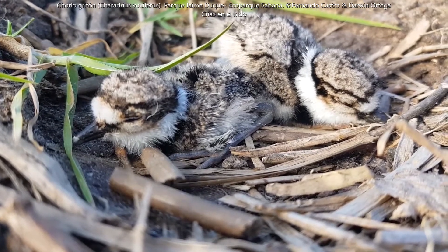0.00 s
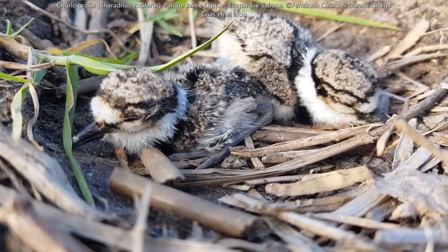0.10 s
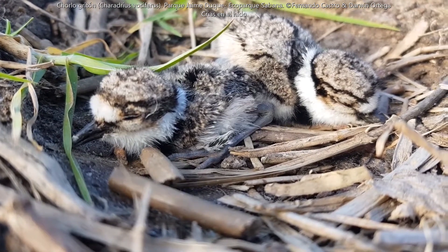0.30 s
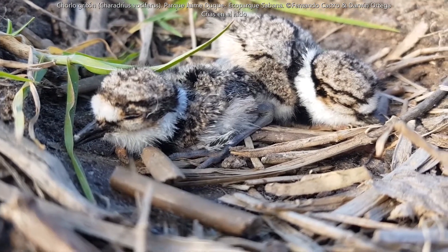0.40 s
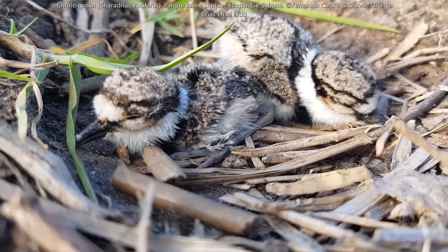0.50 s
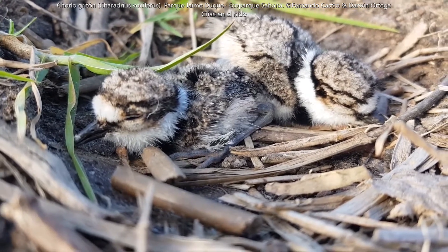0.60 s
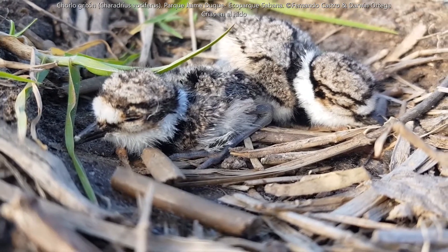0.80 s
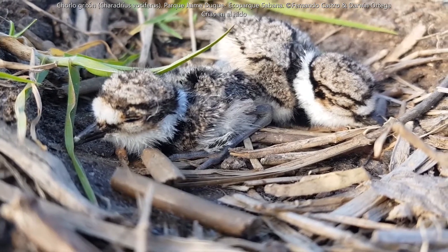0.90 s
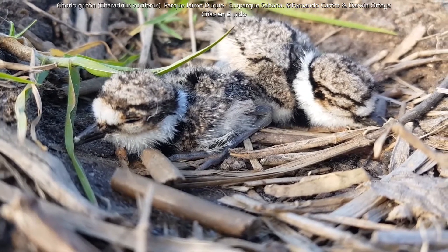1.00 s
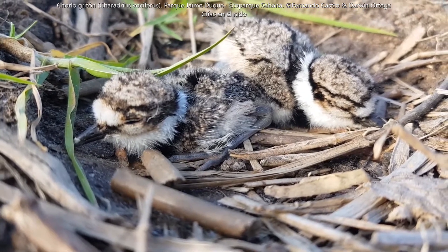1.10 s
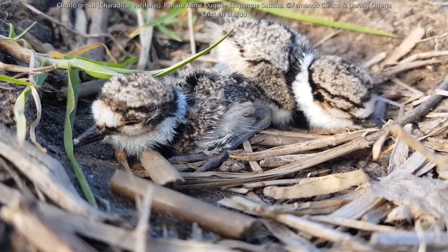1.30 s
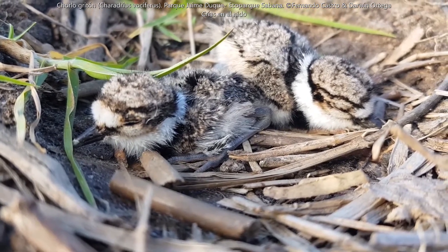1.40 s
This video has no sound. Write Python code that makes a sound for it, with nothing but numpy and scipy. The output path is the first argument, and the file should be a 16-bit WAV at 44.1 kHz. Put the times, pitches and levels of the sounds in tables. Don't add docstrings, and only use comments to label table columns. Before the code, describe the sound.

A small plover close by gives one sharp, clear rising whistle with a brief rough break, then two faint nasal squawks and a thin distant whistle, over low wind rumble on an outdoor stereo microphone.

```python
import sys
import numpy as np
from scipy import signal
from scipy.io import wavfile
from scipy.ndimage import uniform_filter1d

SR = 44100
rng = np.random.default_rng(int(sys.argv[2]) if len(sys.argv) > 2 else 0)


def unload_audio(sound):
    columns = np.transpose(np.atleast_2d(sound))
    steps = np.round(np.clip(columns, -1, 1) * 32767)
    wavfile.write(sys.argv[1], SR, steps.astype(np.int16))


def volts_from_decibels(level):
    exponent = np.asarray(level, float) / 20
    return 10 ** exponent


N = 63945

# time in s, pitch in Hz, level in dB, octave level in dB, left-right in dB.
NEAR_PARTS = [
    [(.2055, 3150, -50, -72, 2.5), (.208, 3290, -36, -63, 4), (.212, 3610, -35, -58, 8),
     (.218, 3865, -27.5, -57, 7), (.222, 4050, -31, -54, 5), (.2243, 4280, -42, -51, .5),
     (.226, 4390, -36.5, -50, .5), (.228, 4210, -38, -53, -5), (.230, 4250, -43, -57, -10)],
    [(.234, 4330, -34, -58, -5), (.242, 4500, -27, -53, 5), (.252, 4610, -22, -50, 7.5),
     (.262, 4682, -22, -50, 8), (.274, 4725, -22, -49.5, 8.5), (.282, 4720, -23, -49, 8),
     (.286, 4665, -20, -47, 7.5), (.298, 4678, -20.5, -46, 7), (.306, 4575, -19, -46, 6.5)],
    [(.312, 4535, -22, -48, 5.5), (.324, 4508, -23.5, -49, 4.5), (.334, 4520, -23.5, -50, 4),
     (.378, 4606, -22, -50.5, 6), (.392, 4615, -22, -50.5, 7), (.404, 4652, -22, -51, 8),
     (.42, 4670, -23, -51, 8.5), (.44, 4645, -26, -55, 8.5), (.452, 4688, -29, -57, 8.5)],
    [(.476, 4776, -29, -61, 8), (.504, 4892, -31, -65, 7.5), (.528, 4900, -36.5, -74, 7),
     (.541, 4890, -60, -96, -6)],
]
# time in s, pitch in Hz, level in dB,
# octave level in dB, left-right in dB.
REGISTER_JUMP = [(.339, 4480, -26.5, -53, 4.5), (.342, 4610, -25, -56, 5.5), (.35, 4650, -23, -54, 6.5),
                 (.354, 4600, -23.5, -54, 7), (.357, 4690, -24, -54, 7.5), (.362, 4710, -26.5, -56, 8),
                 (.368, 4712, -24.5, -55, 8), (.3705, 4600, -23, -55, 7.5)]
# centre in s, length in s, flutter in dB, flutter in Hz, width in Hz.
ROUGH_SPELLS = [(.2755, .004, -18, 1200, 1200), (.279, .003, -14, 1300, 1200),
                (.2825, .004, -11, 1100, 1400), (.2885, .004, -17, 1000, 400),
                (.285, .055, -26, 1500, 3200), (.342, .003, -22, 900, 900), (.357, .03, -23, 700, 1600),
                (.31, .17, -31, 900, 3000), (.398, .012, -26, 700, 500), (.385, .03, -38, 1800, 500),
                (.226, .008, -16, 700, 1000), (.212, .014, -21, 2000, 5000), (.528, .01, -23, 1000, 1600)]
# centre in s, length in s, level below pitch in dB, level above pitch in dB.
TRIPLING = (.297, .013, -19, -30)
# time in s, pitch in Hz, level in dB, half-pitch line in dB,
# left-right in dB.
FAR_PARTS = [
    [(0.978, 3966, -86, -6, 4), (0.984, 3938, -56.5, -7, 1), (1.004, 4015, -53, -5, -9),
     (1.012, 3904, -47, -19, 1)],
    [(1.03, 3554, -57.5, -16, -12), (1.056, 3494, -59.5, -21, -13), (1.08, 3530, -53, -26, -7),
     (1.1, 3614, -54, -14, -7)],
    [(1.14, 3697, -57, -8, 19), (1.196, 3755, -56.5, -2, 10), (1.234, 3817, -60.5, -9, -23),
     (1.266, 3853, -49.5, -11.5, -8), (1.336, 3860, -56.5, -7, 3), (1.382, 3908, -53, -11.5, -2),
     (1.416, 3920, -47.5, -28, -2), (1.45, 3912, -47, -20, -2)],
]
# time in s, pitch in Hz, level in dB, half-pitch line in dB,
# left-right in dB.
FAR_DROP = [
    (1.017, 3850, -68, -12, -3.5),
    (1.024, 3640, -62, -16, -5),
]
# multiple of the pitch, level in dB.
FAR_PARTIALS = [(1, 0), (1.5, -30), (2, -32), (2.5, -38)]
# start in s, length in s, level in dB, top pitch in Hz, end pitch as a share of the top.
SQUAWKS = [
    (.628, .085, -43, 835, .75),
    (1.108, .08, -40, 845, .76),
]
# centre in Hz, width in Hz, level in dB.
BEAK_RESONANCES = [(2380, 560, 1), (3150, 800, -5), (3650, 450, -9), (5800, 400, -16), (7700, 500, -26),
                   (10400, 1200, -28)]
# share of its length, level in dB.
SQUAWK_EFFORT = [(0, -8), (.09, -5), (.19, 2), (.29, -2), (.37, -8), (.48, -2), (.62, -5), (.75, -9),
                 (1, -12)]
# start in s, length in s, level in dB,
# pitch in Hz.
PEEPS = [
    (.079, .013, -62, 3150),
    (.173, .011, -65, 3130),
    (.156, .006, -70, 5200),
    (.198, .004, -60, 3900),
    (.201, .002, -58, 3600),
    (1.109, .014, -50, 2310),
    (1.112, .012, -57, 3110),
]
# centre in s, length in s, level in dB, centre in Hz, width in octaves.
RASPS = [
    (.67, .1, -63, 2800, 1.0),
    (1.155, .1, -62, 3000, .8),
    (.279, .012, -41, 3300, .2),
    (.428, .02, -66, 5950, .04),
    (.48, .06, -72, 8500, .06),
]
# centre in s, length in s, level in dB, centre in Hz, width in octaves.
RUSTLES = [
    (0.466, 0.056, -52.5, 1700, 1),
    (0.58, 0.33, -52, 1230, 1),
    (0.67, 0.085, -65, 10000, 0.23),
    (0.24, .08, -72, 2100, 0.26),
    (0.442, 0.13, -42.5, 117, 0.38),
    (.572, 0.035, -33, 65, 0.65),
    (0.896, 0.061, -42, 68, 0.46),
    (1.424, 0.13, -55, 170, 0.34),
    (1.29, 0.28, -77, 11000, 0.51),
]
# frequency in Hz, density in dB per Hz.
WIND_SPECTRUM = [(12, -45), (20, -34.5), (64, -0.5), (182, -12.5), (248, -15), (285, -10), (468, -16.5),
                 (518, -17.5), (1200, -27.5), (1560, -83), (2640, -120)]
# frequency in Hz, density in dB per Hz.
AIR_SPECTRUM = [(1200, 1), (2000, -11.5), (3300, -18), (6200, -23), (6800, -51), (8200, -34), (10000, -34),
                (11600, -36.5)]
# frequency in Hz, left-right likeness from 0 to 1.
PORT_LIKENESS = [(30, .3), (55, .6), (140, .94), (300, .91), (600, .68), (1400, .4), (3000, .15),
                 (5000, .1)]
# frequency in Hz, left-right in dB.
PORT_BALANCE = [(60, -0.5), (200, 0), (700, 3.5), (1300, 1), (3000, -4), (8000, -2.5)]
# centre in s, length in s, low edge in Hz, high edge in Hz.
HISS_GATE = (.455, .11, 5600, 8200)


def evened(x):
    return x / np.sqrt(np.mean(abs(x) ** 2) + 1e-20)


def read(points, hz):
    f, value = np.transpose(points)
    return np.interp(np.log(hz + 1), np.log(f + 1), value)


def bump(centre, length):
    return np.exp(-abs((np.arange(N) / SR - centre) / (length / 1.8)) ** 3)


def curve(parts):
    t = np.arange(N) / SR
    rows = np.array(sorted(tuple(row) for part in parts for row in part))
    inside = 1. * (t >= rows[0, 0]) * (t <= rows[-1, 0])
    columns = [uniform_filter1d(np.interp(t, rows[:, 0], c), size=60) for c in rows.T[1:]]
    return columns, uniform_filter1d(inside, size=90)


def placed(z, pan_db, lag_rad):
    left = volts_from_decibels(pan_db / 2) * np.exp(1j * lag_rad)
    right = volts_from_decibels(-pan_db / 2)
    return np.sqrt(2) * np.real([z * left, z * right]) * 2 / abs(left + right)


def flutter(hz, width):
    f = np.fft.fftfreq(N, 1 / SR)
    z = rng.standard_normal(N) + 1j * rng.standard_normal(N)
    return evened(np.fft.ifft(z * np.exp(-.5 * ((abs(f) - hz) / (width / 2)) ** 2)))


def near_whistle():
    (hz, db, octave_db, pan), gate = curve([*NEAR_PARTS, REGISTER_JUMP])
    third = np.exp(1j * 2 * np.pi * np.cumsum(hz) / SR / 3)
    shake = 1 + volts_from_decibels(-35) * flutter(0, 500)
    for centre, length, flutter_db, flutter_hz, width in ROUGH_SPELLS:
        shake = shake + volts_from_decibels(flutter_db) * bump(centre, length) * flutter(flutter_hz, width)
    centre, length, low_db, high_db = TRIPLING
    tripled = bump(centre, length) * (volts_from_decibels(low_db) * third ** 2 + volts_from_decibels(high_db) * (third ** 4 + .5 * third))
    main = volts_from_decibels(db) * (shake * third ** 3 + tripled)
    octave_shake = 1 + 0.43 * (shake - 1) + 0.081 * flutter(0, 900)
    octave = volts_from_decibels(octave_db) * octave_shake * third ** 6
    return gate * (placed(main, pan, -1.78) + placed(octave, pan - 2, -1.93))


def far_whistle():
    (hz, db, half_db, pan), gate = curve([*FAR_PARTS, FAR_DROP])
    phase = 2 * np.pi * np.cumsum(hz) / SR
    tone = sum(volts_from_decibels(d) * np.exp(1j * k * phase) for k, d in FAR_PARTIALS)
    tone = tone * (1 + 0.13 * flutter(0, 97))
    half = volts_from_decibels(db + half_db) * np.exp(.5j * phase)
    return gate * (placed(volts_from_decibels(db) * tone, pan, -0.41) + placed(half, 12.0, -.6))


def squawk(start, length, db, top_hz, end):
    hold, rough, port_lag_s = .24, .28, .0003
    u = np.clip((np.arange(N) / SR - start) / length, 0, 1)
    sag = np.clip((u - hold) / (1 - hold), 0, 1)
    hz = top_hz * (1 - (1 - end) * sag ** 1.15 - .04 * np.exp(-u / .08))
    phase = 2 * np.pi * np.cumsum(hz) / SR
    out = np.zeros((2, N))
    for k in range(1, 17):
        resonance = sum(volts_from_decibels(d) * np.exp(-((k * hz - f) / (w / 2)) ** 2) for f, w, d in BEAK_RESONANCES)
        tone = resonance * np.exp(1j * k * phase)
        for port in range(2):
            shake = 1 + rough * flutter(0, 60 * k) + .15 * flutter(0, 120)
            lag = np.exp(1j * port * 2 * np.pi * k * hz * port_lag_s)
            out[port] += (tone * shake * lag).real
    effort = volts_from_decibels(db + np.interp(u, *np.transpose(SQUAWK_EFFORT)))
    return effort * np.clip(u / .05, 0, 1) * np.clip((1 - u) / .12, 0, 1) * out


def peeps():
    t = np.arange(N) / SR
    out = np.zeros((2, N))
    for start, length, db, hz in PEEPS:
        blip = volts_from_decibels(db) * bump(start + length / 2, length) * np.exp(1j * 2 * np.pi * hz * t)
        out += placed(blip, 2.5, 0.094)
    return out


def puffs(rows):
    out = np.zeros((2, N))
    for centre, length, db, hz, octaves in rows:
        noise = wash(lambda f: -6 * (np.log2((f + 1) / hz) / octaves) ** 2, 1.8, .1)
        out += volts_from_decibels(db) * bump(centre, length) * noise
    return out


def rasps():
    return puffs(RASPS)


def rustles():
    return puffs(RUSTLES)


def field(x):
    t60_s, level_db = .08, -34
    t = np.arange(SR // 2) / SR
    taps = rng.standard_normal((2, len(t))) * (rng.random((2, len(t))) < .05)
    taps = taps * volts_from_decibels(-60 * t / t60_s) * (t > .003)
    return volts_from_decibels(level_db) * signal.fftconvolve(x, taps / np.linalg.norm(taps[0]), axes=1)[:, :N]


def wash(shape_db, patchy_db, swell_db):
    port_lag_s = 0.00042
    frames, hz = N // 256 + 5, np.fft.rfftfreq(1024, 1 / SR)
    a, b, c, d, patches = rng.standard_normal((frames, 513, 5)).T
    swell = evened(uniform_filter1d(patches[0], size=20))
    patches = uniform_filter1d(patches, size=8, axis=0)
    patches = evened(uniform_filter1d(patches, size=10, axis=1))
    same = np.clip(read(PORT_LIKENESS, hz), -1, 1)[:, None]
    lean = volts_from_decibels(read(PORT_BALANCE, hz) / 2)[:, None]
    late = np.exp(1j * 2 * np.pi * hz * port_lag_s)[:, None]
    left = a + 1j * b
    right = same * late * left + np.sqrt(1 - same ** 2) * (c + 1j * d)
    z = np.array([left * lean, right / lean])
    z *= volts_from_decibels(shape_db(hz)[:, None] + patchy_db * patches + swell_db * swell)
    x = signal.istft(z, nperseg=1024, noverlap=768)[1][:, :N]
    return x / np.sqrt(np.mean(x.mean(0) ** 2))


def wind():
    return volts_from_decibels(-40.5) * wash(lambda f: read(WIND_SPECTRUM, f) - 60 * (f > 1200), 1.0, 0.29)


def air():
    return volts_from_decibels(-60) * wash(lambda f: read(AIR_SPECTRUM, f) - 60 * (f <= 1200) - 40 * (f > 11700), 1.5, .8)


def scene():
    birds = near_whistle() + far_whistle() + peeps() + sum(squawk(*row) for row in SQUAWKS)
    return birds + field(birds) + rasps() + rustles() + wind() + air()


def top_cut(x):
    return signal.sosfilt(signal.butter(12, 15820, fs=SR, output="sos"), x)


def record(dry):
    mic_top_hz, image_shift_hz, image_db = 11700, 9645, -33
    dry = signal.oaconvolve(dry, signal.firwin(255, mic_top_hz, fs=SR)[None], "same")
    centre, length, low_hz, high_hz = HISS_GATE
    hiss_band = signal.firwin(511, [low_hz, high_hz], pass_zero=False, fs=SR)
    hiss = signal.oaconvolve(dry, hiss_band[None], "same")
    dry = dry - bump(centre, length) * hiss
    band = signal.sosfilt(signal.butter(4, [3300, 5200], "band", fs=SR, output="sos"), dry)
    shift = np.exp(1j * 2 * np.pi * image_shift_hz * np.arange(N) / SR)
    image = (signal.hilbert(band) * shift).real
    return top_cut(dry + volts_from_decibels(image_db) * image)


dry = scene()
out = record(dry)
unload_audio(out)
```